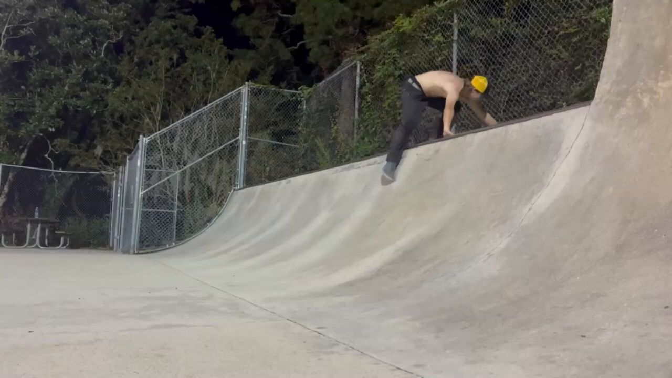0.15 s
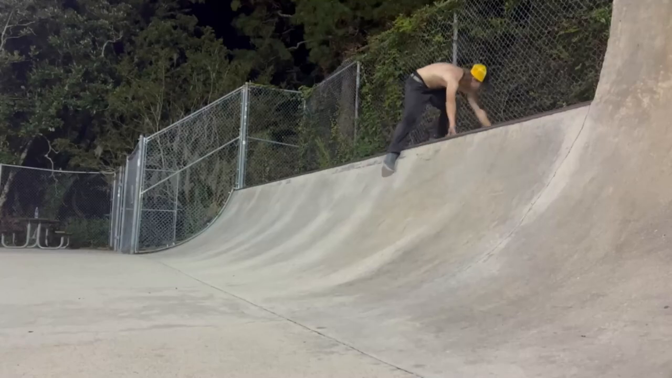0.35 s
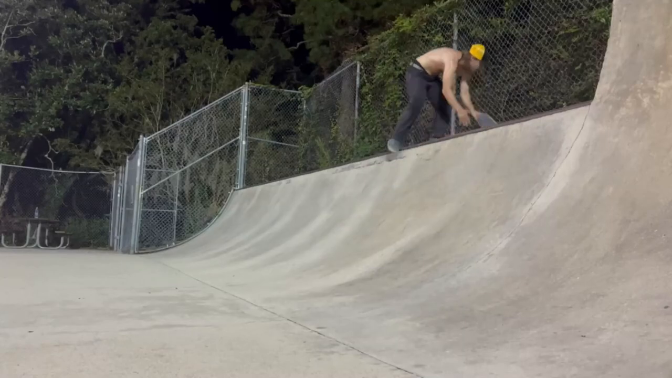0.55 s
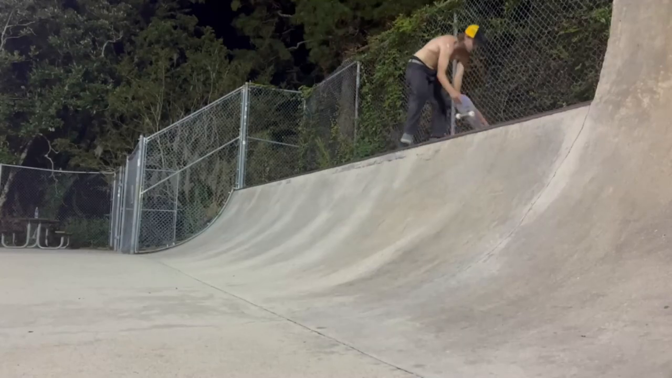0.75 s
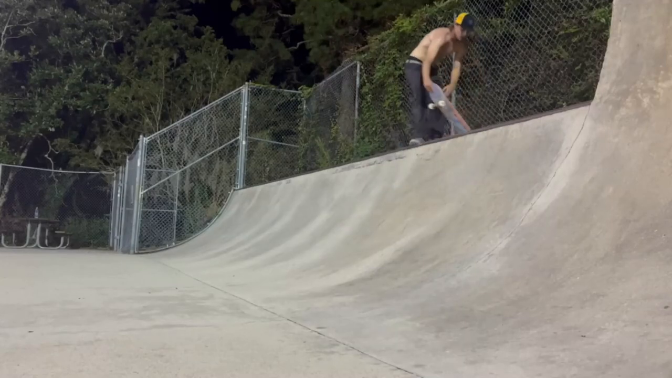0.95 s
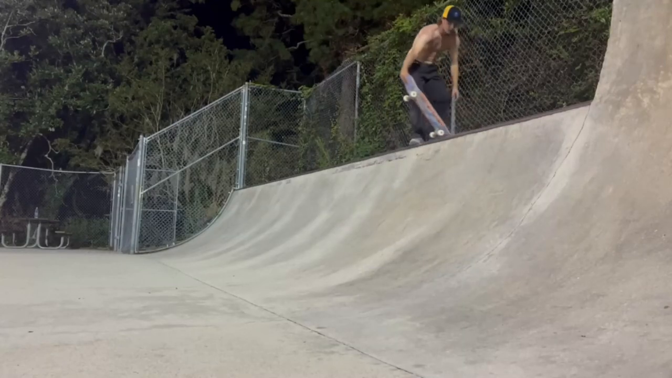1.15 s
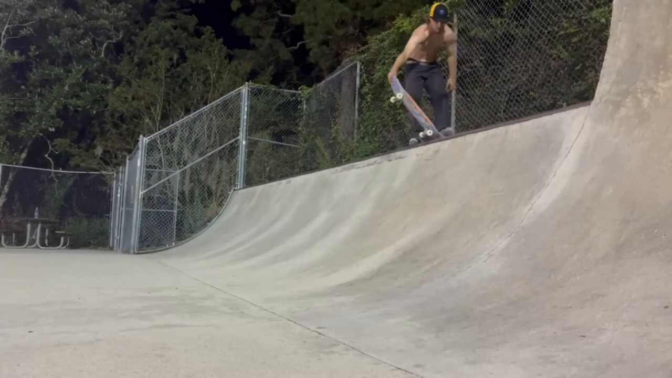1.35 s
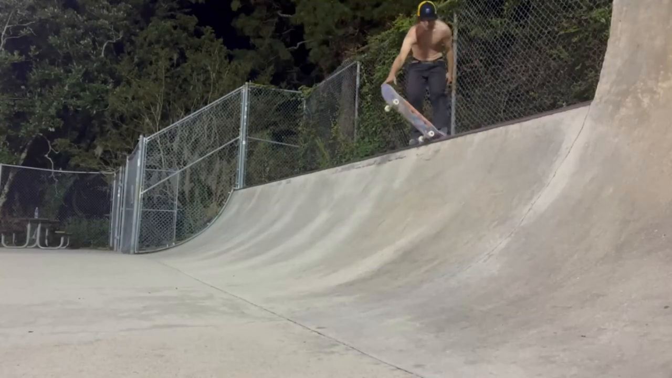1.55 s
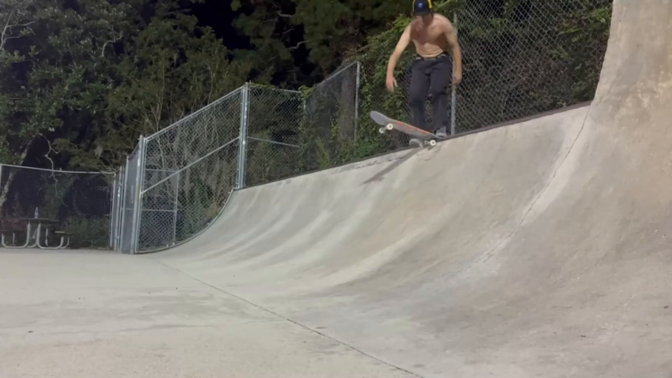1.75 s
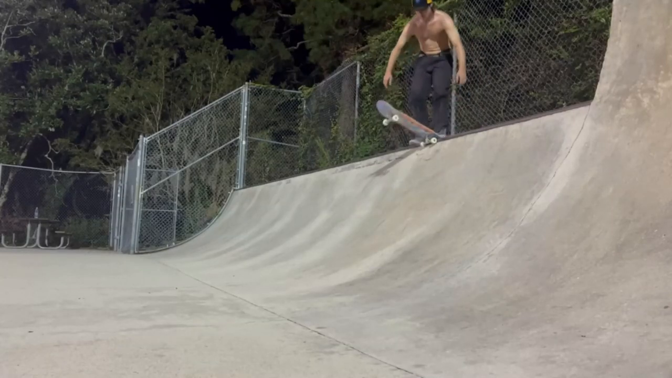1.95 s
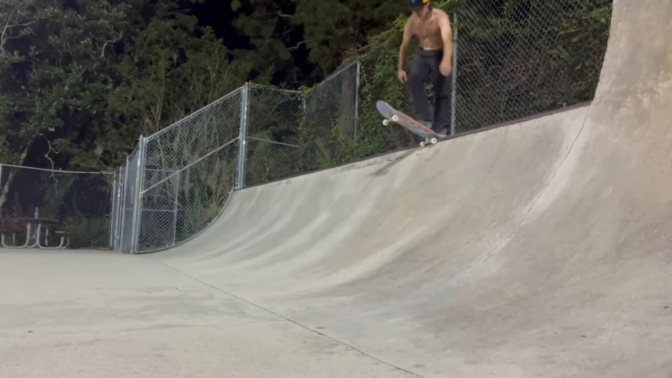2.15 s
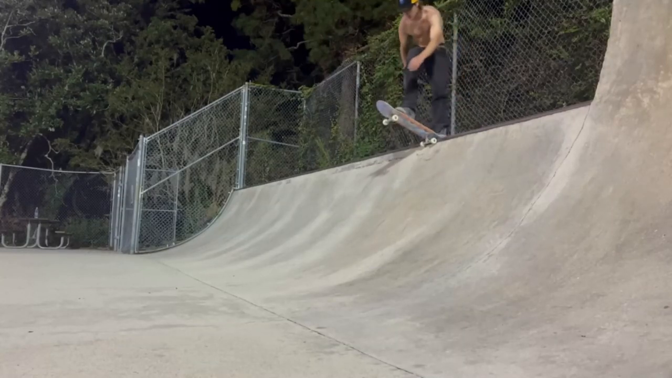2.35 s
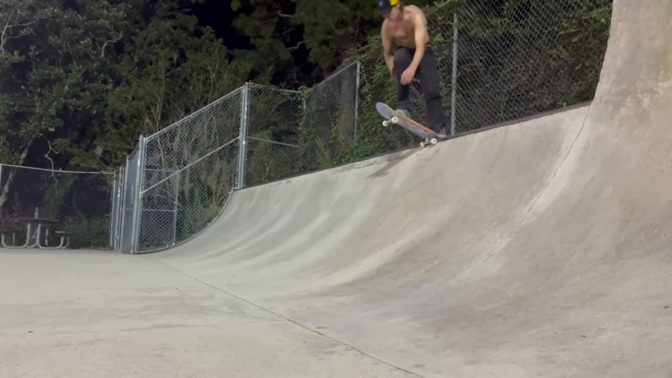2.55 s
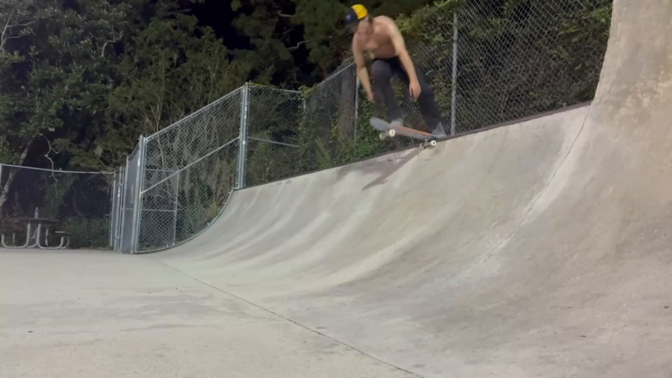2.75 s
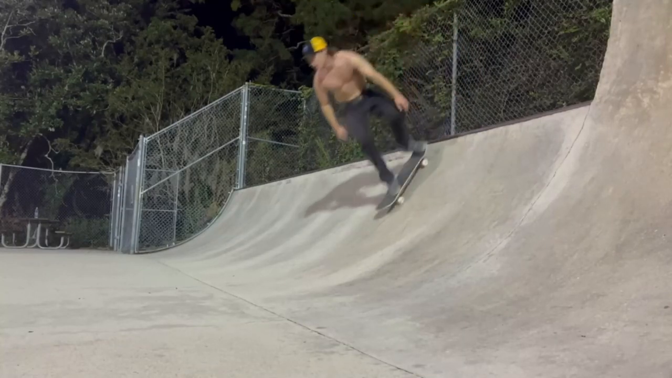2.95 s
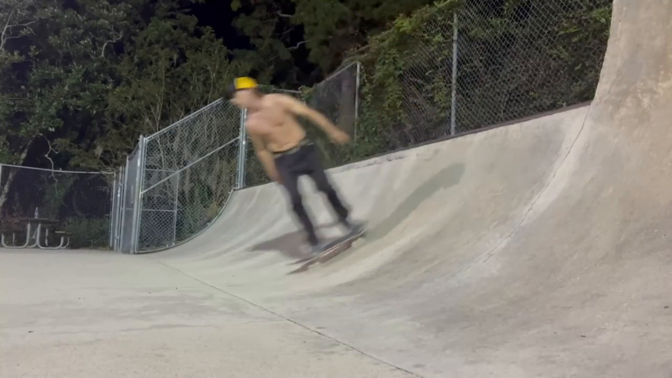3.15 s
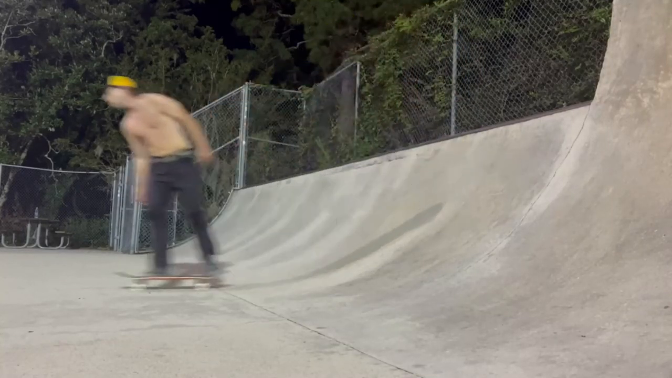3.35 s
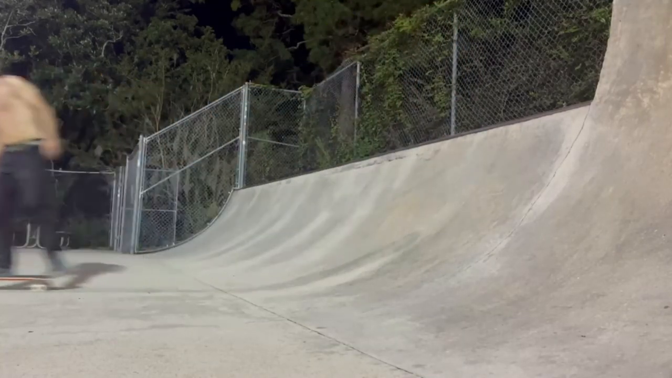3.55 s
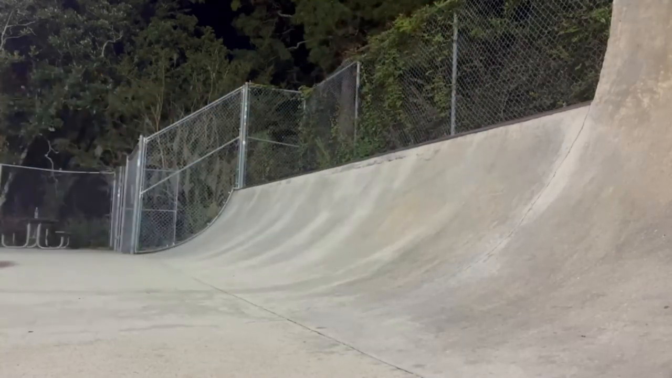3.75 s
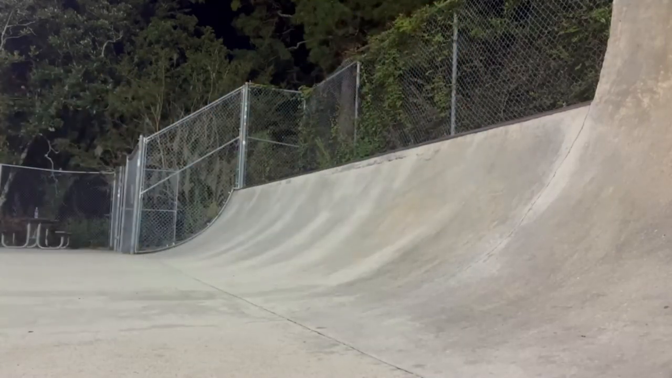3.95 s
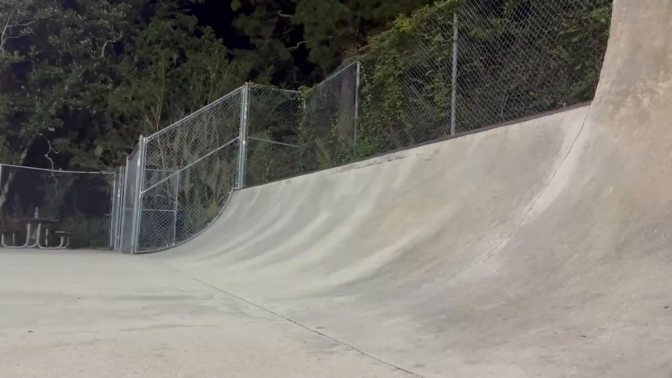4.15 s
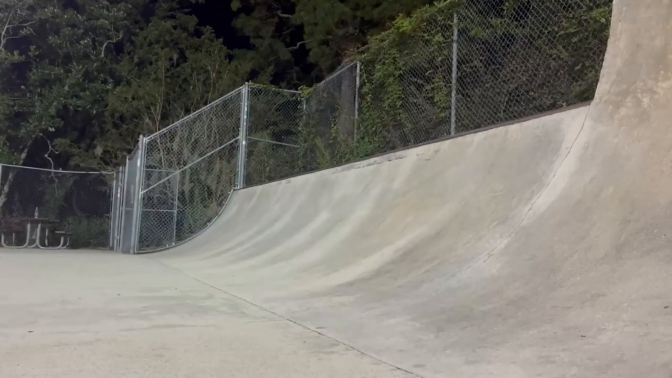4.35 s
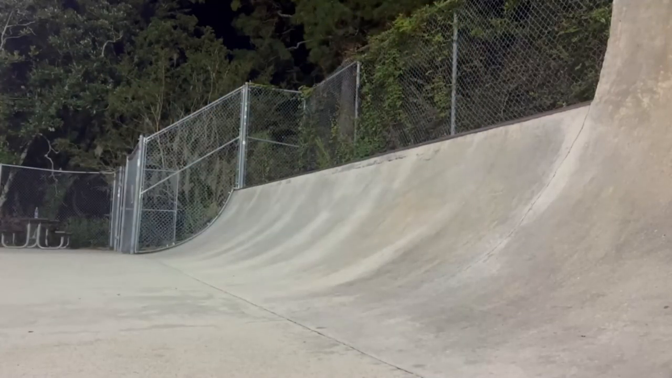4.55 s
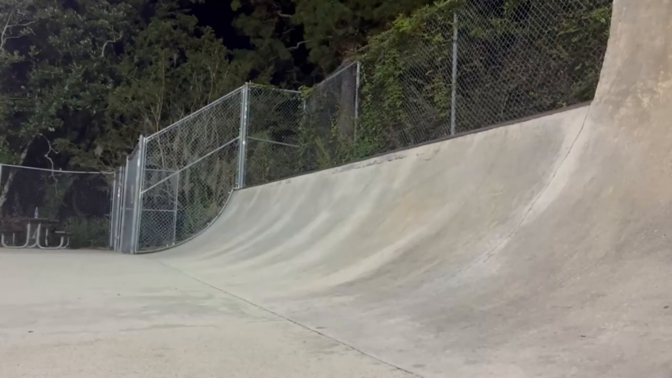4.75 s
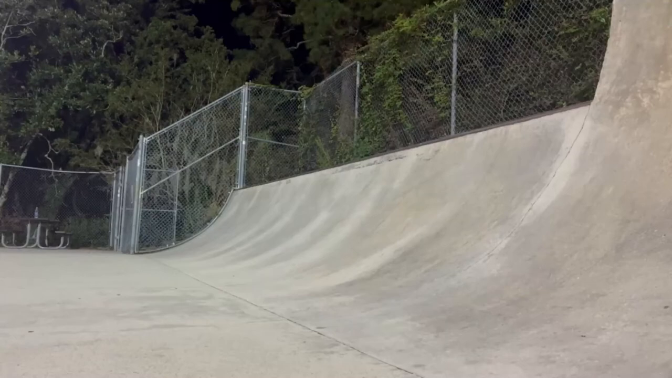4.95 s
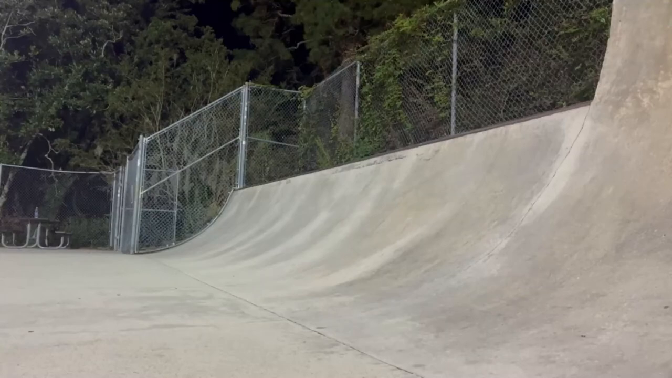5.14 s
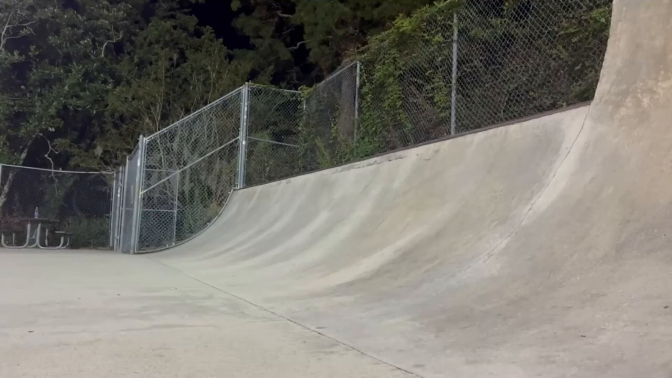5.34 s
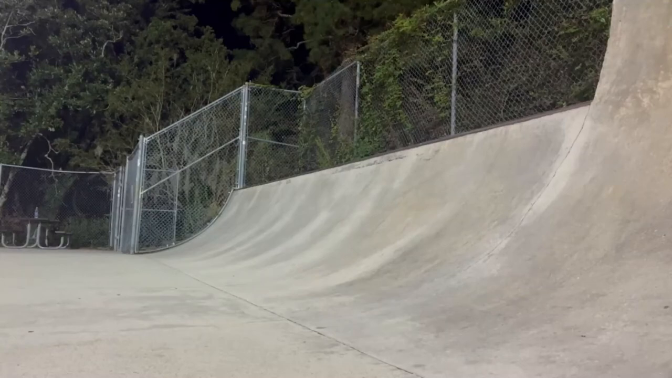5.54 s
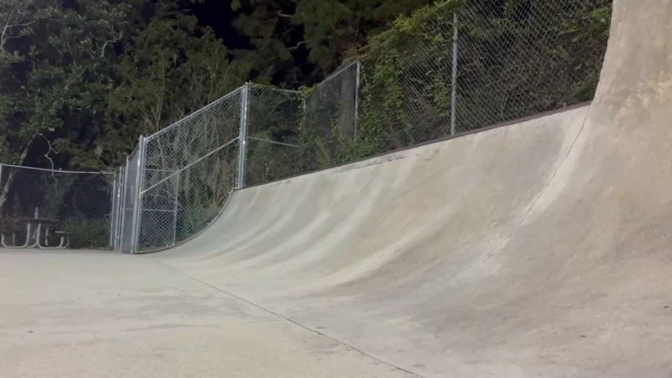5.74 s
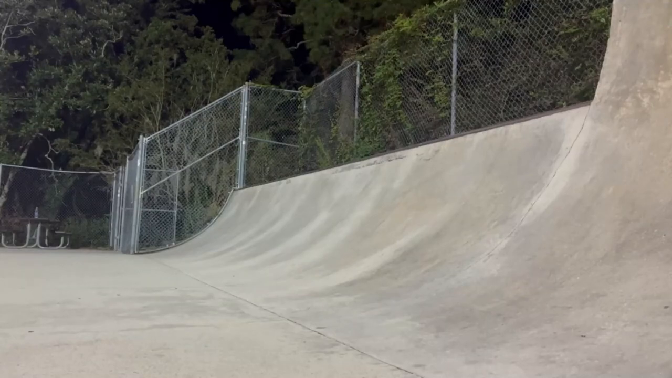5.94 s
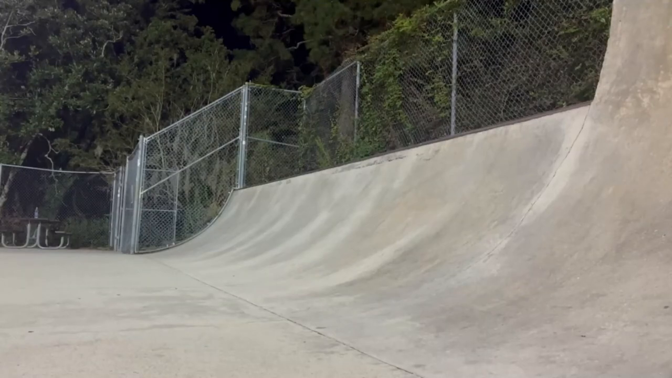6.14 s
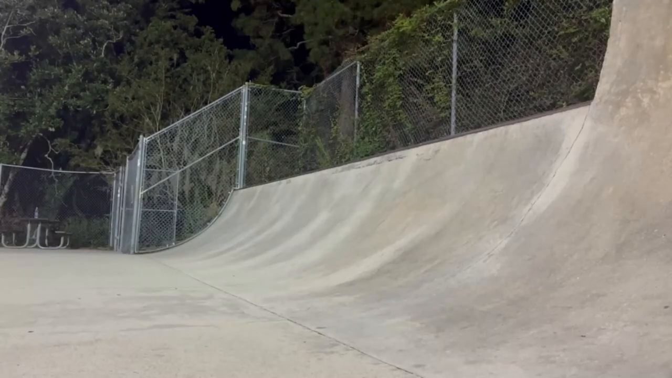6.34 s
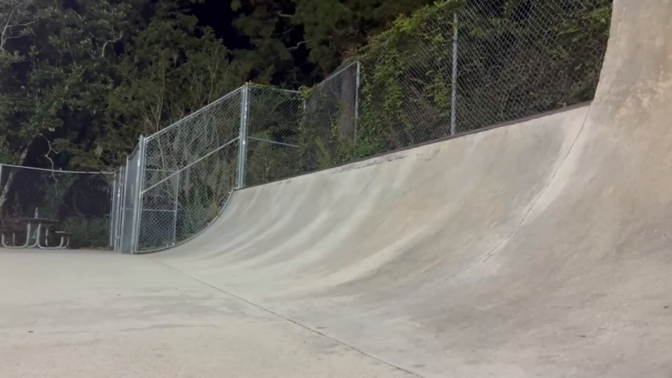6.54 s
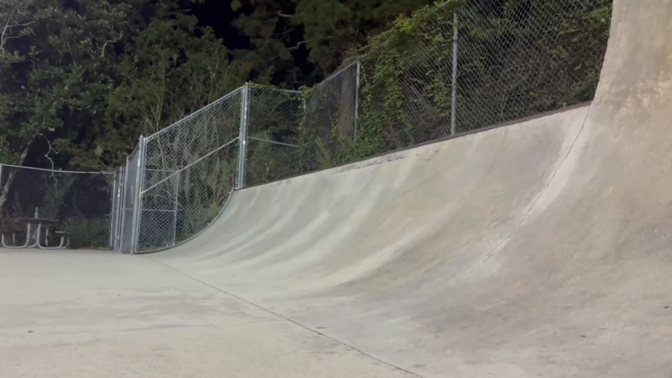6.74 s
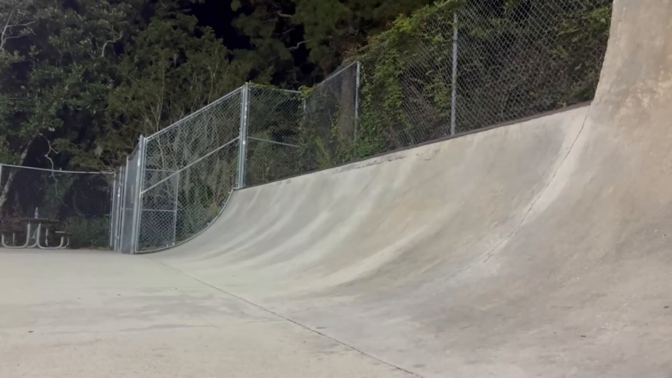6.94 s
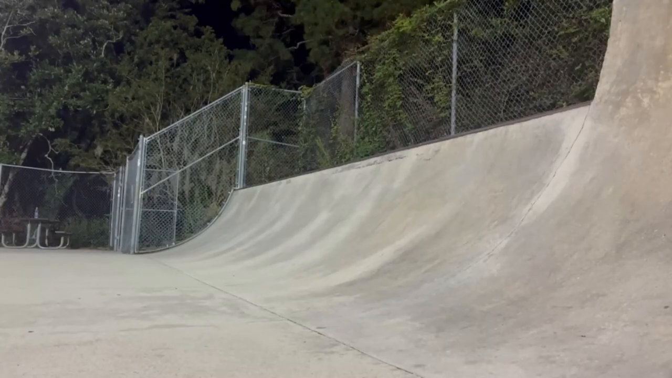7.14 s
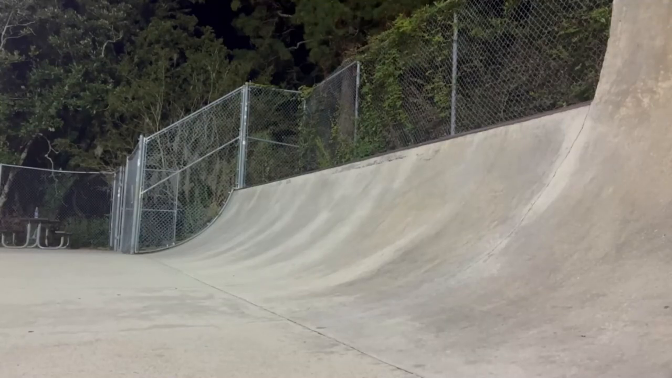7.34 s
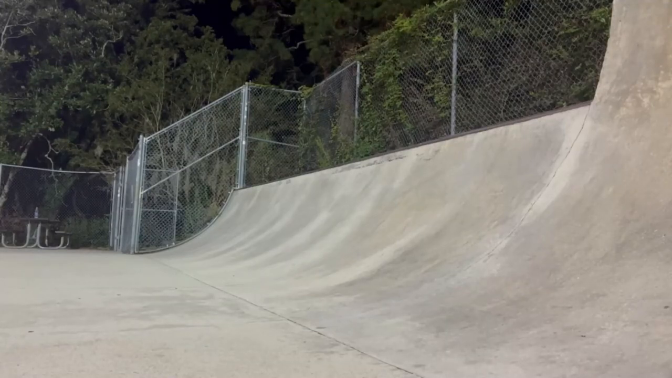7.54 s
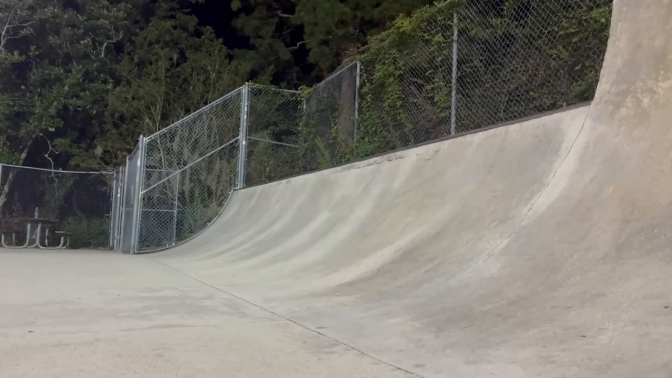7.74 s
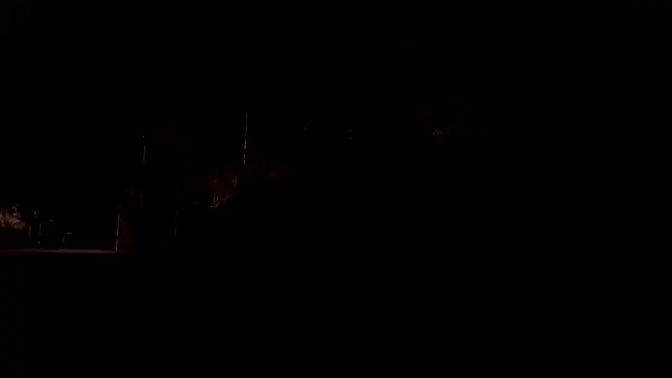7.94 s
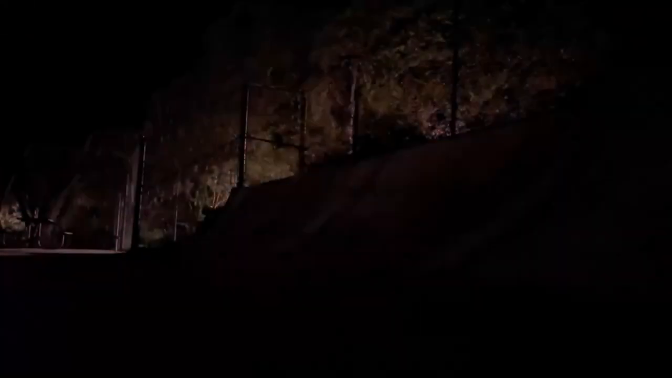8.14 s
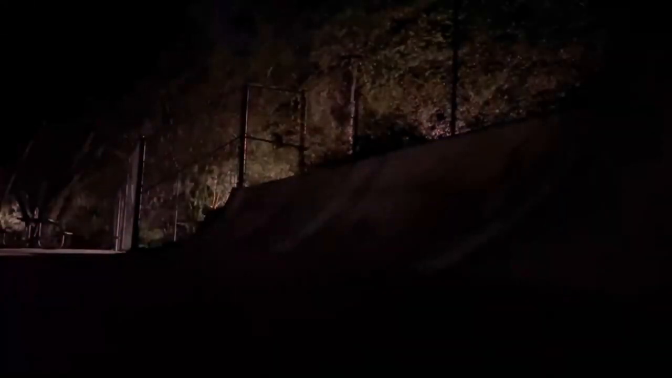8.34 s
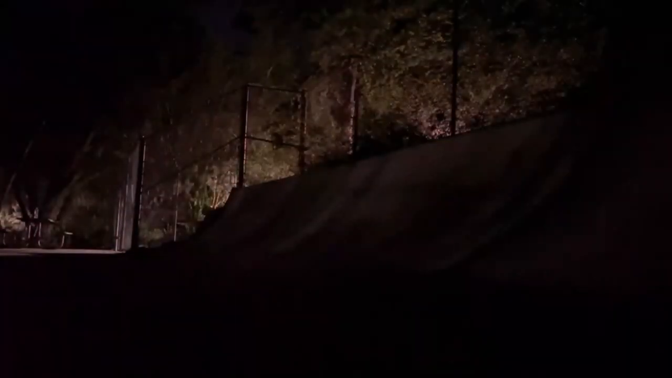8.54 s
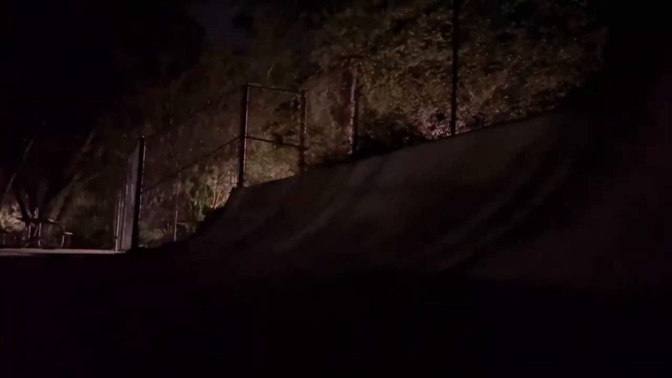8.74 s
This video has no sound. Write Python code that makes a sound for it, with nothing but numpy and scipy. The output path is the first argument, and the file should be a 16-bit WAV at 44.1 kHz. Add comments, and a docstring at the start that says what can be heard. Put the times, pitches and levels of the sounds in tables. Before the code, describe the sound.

Outdoors at night, crickets chirp over a faint low town rumble. A skateboard is dragged and knocked on a concrete ramp edge, giving a short woody groan, then set down with clacks. It slams into the ramp, and hard wheels roar away to the left, fading before a distant pop and clatter. Stereo microphones stay fixed, with little reverberation.

```python
"""Skateboard on a concrete quarter pipe at night: dragged, set on the coping, dropped in, rolled off to
the left, popped and set down. Blows ring deck modes; scrapes and wheels are rough forces shaped by the body.
Crickets chirp and trill as pulsed tones, a far chorus shimmers as banded noise, a town rumbles as low noise.
Two spaced microphones: delay, level, phase, ramp reflections and reverberation follow the board."""
import sys
import numpy as np
from scipy import signal
from scipy.fft import rfft, irfft, next_fast_len
from scipy.io import wavfile
from scipy.ndimage import uniform_filter1d, map_coordinates

SR = 44100
rng = np.random.default_rng(int(sys.argv[2]) if len(sys.argv) > 2 else 0)


def waveform_to_disk(signal):
    """Save audio, clipped to [-1, 1], as 16-bit WAV at the path in sys.argv[1]."""
    frames = np.transpose(np.atleast_2d(signal))
    scaled = np.clip(frames, -1, 1) * 32767
    samples = np.round(scaled).astype(np.int16)
    wavfile.write(sys.argv[1], SR, samples)


N = 392049


def amp(db):
    """Decibels to gain."""
    return 10 ** (np.asarray(db) / 20)


def unit(x):
    """x at rms 1."""
    return x / np.sqrt(np.mean(x ** 2) + 1e-20)


def along(points, hz):
    """(f/Hz, value) points interpolated on a log frequency axis."""
    f, v = np.transpose(points)
    return np.interp(np.log(hz + 1), np.log(f + 1), v)


def curves(rows):
    """One value per sample for each column after t/s."""
    s, *cols = np.transpose(rows)
    return [np.interp(np.arange(N) / SR, s, c) for c in cols]


def wobble(rate_hz):
    """Smooth random curve, rate_hz knots a second."""
    knots = rng.standard_normal(int(N * rate_hz / SR) + 4)
    return map_coordinates(knots, [np.arange(N) * rate_hz / SR])


def filtered(x, response):
    """x times a response of frequency."""
    m = next_fast_len(x.shape[-1] + 8192, True)
    spectrum = rfft(x, m) * response(np.fft.rfftfreq(m, 1 / SR))
    return irfft(spectrum, m)[..., :x.shape[-1]]


def add(track, s, sound):
    """Add a sound to a track at time s."""
    part = track[max(round(s * SR), 0):][:len(sound)]
    part += sound[:len(part)]


def causal(gain):
    """Minimum-phase response of this gain: rings only after the blow."""
    c = irfft(np.log(np.maximum(gain, 1e-6)))
    half = len(c) // 2
    return np.exp(rfft(np.r_[c[0], 2 * c[1:half], c[half], np.zeros(half - 1)]))


def deck(modes, hz):
    """Gain of a flat response lifted by resonances."""
    lifts = (amp(db) ** 2 / (1 + (2 * (hz - f) / width) ** 2) for f, width, db in modes)
    return np.sqrt(1 + sum(lifts))


def thirds(hz, low_hz, high_hz):
    """Gains of a low, a middle and a high band whose powers add to one."""
    low = 1 / (1 + (hz / low_hz) ** 8)
    high = 1 / (1 + (hz / high_hz) ** 8)
    return np.sqrt([low, np.abs(high - low), 1 - high])


def grains(rate_hz, spread_db):
    """Random impulses, rate_hz a second on average, log-normal sizes: sand and pits."""
    hits = rng.random(N) < rate_hz / SR
    return unit(hits * rng.standard_normal(N) * amp(spread_db * rng.standard_normal(N)))


def pair(spectrum, alike):
    """Stereo noise of rms 1; alike sets left-right correlation over frequency."""
    def mid_side(hz):
        turn = np.arccos(np.clip(along(alike, hz), -1, 1)) / 2
        return amp(along(spectrum, hz)) * [np.cos(turn), np.sin(turn)]
    mid, side = filtered(rng.standard_normal((2, N)), mid_side)
    return unit(np.array([mid + side, mid - side]))


def panned(x, ports):
    """Left and right at equal total power, with level and phase differences over frequency."""
    rows = np.array(ports)

    def gains(hz):
        ratio = amp(along(rows[:, :2], hz))
        turn = np.exp(.5j * along(rows[:, ::2], hz))
        return np.array([ratio * turn, turn.conj()]) * np.sqrt(2 / (1 + ratio ** 2))
    return filtered(x, gains)


def shifting(x, depth_db, order=3, size=7):
    """Narrow bands of x come and go in short random patches."""
    z = signal.stft(x, nperseg=1024)[2]
    field = uniform_filter1d(rng.standard_normal(z.shape), order, 0)
    field = uniform_filter1d(field, size, 1)
    return signal.istft(z * amp(depth_db * unit(field)), nperseg=1024)[1][:N]


# exponents of low, middle and high band gain against pressure
PRESSURE_EXPONENTS = [1, 0.79, 1]


def strokes(rows):
    """Low, middle and high band gains: pressure rises, then falls, in each stroke."""
    t, power = np.arange(N) / SR, np.zeros((3, N))
    for s, rise, fall, *band_db in rows:
        pressure = np.minimum(1 + (t - s) / rise, 1 - (t - s) / fall)
        touching = pressure > 0
        gain = amp(band_db)[:, None] * pressure[touching] ** np.c_[PRESSURE_EXPONENTS]
        power[:, touching] += gain ** 2
    return np.sqrt(power)


def rubbing(force, colour, gains, low_hz, high_hz):
    """Rough contact force through a body; low, middle and high parts each at their own gain."""
    parts = filtered(force, lambda hz: colour(hz) * thirds(hz, low_hz, high_hz))
    return sum(gain * unit(part) for gain, part in zip(gains, parts))


# town spectrum: [f/Hz, level/dB]
RUMBLE = [(22, -19.5), (35, -14.5), (48, -1.5), (72, 0), (100, -3), (125, -2.5), (180, -11), (250, -13.5),
          (400, -21), (700, -25), (1100, -34.5), (2200, -38), (4000, -52), (12000, -54)]


def town():
    """Far traffic and machinery: low noise, nearly alike at both microphones in the deep bass."""
    level_db, = curves([(0, -45.5), (3, -46.5), (7.5, -48.5), (8.9, -48.5)])
    noise = pair(RUMBLE, [(80, 1.0), (200, 0.76), (500, 0.16), (2000, 0.0464)])
    return amp(level_db + 0.51 * wobble(5.4)) * noise


# far cricket spectrum: [f/Hz, level/dB]
CHORUS = [(4000, -58), (4700, -24.5), (5100, -8), (5550, 0.5), (5900, -5.5), (6250, 2), (6500, 1),
          (6750, -6.5), (7100, -4), (7400, -22), (7800, -48.5), (9000, -69)]
# left against right, source off to the left: [f/Hz, left excess/dB, phase lead/rad]
ASIDE = [(100, -1, -0.024), (359.5, 3, 0.56), (620, 6, 0.69), (1127, 1.5, 0.07), (2500, 1, -0.47),
         (4000, 1.5, 0.23), (5300, 17, -0.14), (6300, 5, -0.058), (7290, 4.5, 0), (8000, 1, -0.016),
         (10500, 1.5, -0.74)]


def chorus():
    """Countless far crickets merge into a shimmering noise band."""
    crowd = pair(CHORUS, [(5000, 0.209), (7000, .05)])
    crowd = crowd * amp(0.52 * wobble(3.0) + 0.3 * wobble(110))
    # singers join and drop out
    crowd = np.array([shifting(channel, depth_db=4.0, order=4, size=12) for channel in crowd])
    return amp(-54.5) * unit(panned(crowd, ASIDE))


def trill(pitch_hz=2700, width_hz=190, pulse_hz=58.2):
    """Low-pitched cricket trilling without pause: sagging tone pulses, smeared by undergrowth."""
    t = np.arange(N) / SR
    stroke = (pulse_hz * t + 0.11 * wobble(3.1)) % 1
    swept_hz = pitch_hz * (1 - 0.092 * (stroke - .5))
    tone = np.sin(2 * np.pi * np.cumsum(swept_hz) / SR + 0.44 * wobble(60))
    pulse = np.sin(np.pi * stroke) ** 4
    pulses = unit(pulse * tone * amp(1.5 * wobble(12)))
    noise = rng.standard_normal((2, N))
    smear = unit(filtered(noise, lambda hz: 1 / (1 + ((hz - pitch_hz) / width_hz * 2) ** 2) ** 1.58))
    throb = unit(.55 + pulse)  # nearby leaves scatter in step with the strokes
    return amp(-77.5) * pulses + amp(-62.0) * smear * throb


# drag colour: [f/Hz, level/dB]
RUB = [(80, -35.5), (180, -9), (265, 4), (380, 0), (640, 2.5), (830, -2), (1200, -7.5), (2000, -11.5),
       (2550, -5.5), (3600, -2), (4600, 1), (6500, 1.5), (9000, 2.5), (12000, -9)]
# board and shoe strokes: [peak t/s, rise/s, fall/s, deck drone level/dB, rasp level/dB, grit level/dB]
SCRAPES = [(.48, 0.42, 0.38, -57.5, -53, -51), (1.08, 0.43, 0.2, -30, -32.5, -47),
           (1.275, 0.04, 0.076, -40.5, -50.5, -61), (1.56, 0.17, 0.12, -51.5, -56.5, -64.5),
           (1.72, 0.052, 0.01, -34.5, -57, -41.5), (1.86, 0.25, 0.35, -43.5, -53, -56.5),
           (2.41, 0.081, 0.097, -48, -53.5, -59), (2.69, 0.11, 0.14, -49, -56.5, -68),
           (2.835, 0.076, 0.042, -62, -51, -55)]
# modes in the hand: [f/Hz, width/Hz, lift/dB]
HELD = [(295, 47, 21), (470, 57, 25), (560, 60, 14), (720, 82, 8.5), (1045, 130, 11.5), (1215, 150, 10.5),
        (1486, 120, 9.5), (1790, 70, 11.5), (1980, 74, 8.5), (2600, 83, -8), (3170, 140, 1.5)]
# modes on the coping: [f/Hz, width/Hz, lift/dB]
PERCHED = [(210, 49, 19), (303, 50, 3.8), (438, 50, 13.8), (566, 91, 17), (930, 45, 6.5), (1217, 97, 8.4),
           (1550, 120, 11), (1864, 98, 11), (2242, 103, 12.2), (2750, 230, 3.3), (3390, 140, 8),
           (9800, 4700, 10.7)]
SKIPS_PER_S, SKIP_DB = 31, 1.4  # mean rate; swing either way


def scrape():
    """Board chatters over concrete, catching and slipping: in the hand, then on the coping."""
    t = np.arange(N) / SR
    skips = np.cos(2 * np.pi * (SKIPS_PER_S * t + 0.33 * wobble(14)))
    force = grains(rate_hz=5000, spread_db=1.0) + 0.71 * rng.standard_normal(N)
    force = force * amp(SKIP_DB * skips + 1.0 * wobble(110))
    force = shifting(force, depth_db=3.2, order=7, size=4)
    gains = strokes(SCRAPES)

    def through(modes):
        return rubbing(force, lambda hz: amp(along(RUB, hz)) * deck(modes, hz), gains, 1150, 2200)
    perched_from_s = STANCES[1][0]
    return np.where(t < perched_from_s, through(HELD), through(PERCHED))


# scattered tail: [f/Hz, t60/s]
PARK = [(150, 0.22), (1000, 0.11), (3000, 0.095), (10000, 0.08)]


def park(x):
    """Ramps, fence and trees scatter a thin decaying tail, different at each microphone."""
    hz, t, z = signal.stft(rng.standard_normal((2, SR // 2)), SR, nperseg=256)
    decay = amp(-60 * t / along(PARK, hz)[:, None])
    tail = signal.istft(z * decay, SR, nperseg=256)[1]
    tail = tail * (1 - np.exp(-np.arange(tail.shape[1]) / SR / 0.00076))
    return signal.fftconvolve(x[None], tail / np.linalg.norm(tail[0]), axes=1)[:, :N]


# near crickets: [mean f/Hz, level before panning/dB, list of chirp t/s]
CRICKETS = [(5165, -61, [1.42, 2.82, 4.44, 6.2, 7.88]),
            (5355, -59.5, [.58, 1.8, 2.54, 3.07, 4.48, 5.81, 7.08, 8.47]),
            (5410, -56.5, [.69, 2.11, 3.71, 5.02, 6.58, 8.68]), (5510, -53.5, [.43, 1.58]),
            (5545, -61, [1.44, 2.14, 2.62, 3.13, 3.7, 4.48, 5.53, 5.92, 6.65, 7.48, 7.96, 8.6]),
            (5780, -63.5, [.08, .48, 2.19, 3.36, 4.73, 6.18, 6.43, 7.64, 8.36])]
CHIRP_SCATTER = .002  # relative pitch deviation from chirp to chirp


def chirps(length_s=0.13, pulse_hz=63, sag=0.043):
    """Chirp: a run of wing strokes, each a tone sagging in pitch; bushes on the left blur it."""
    out, t = np.zeros(N), np.arange(int(length_s * SR)) / SR
    swell = np.sin(np.pi * t / length_s) ** .5
    flutter = np.pad(wobble(120), (0, SR))
    for hz, db, times in CRICKETS:
        for s, (pace, sharp) in zip(times, rng.standard_normal((len(times), 2))):
            stroke = (t * pulse_hz * (1 + 0.0173 * pace)) % 1
            swept_hz = hz * (1 + CHIRP_SCATTER * sharp - sag * (stroke - .5))
            phase = 2 * np.pi * np.cumsum(swept_hz) / SR
            tone = np.sin(phase + .5 * flutter[round(s * SR):][:len(t)])
            add(out, s, amp(db) * unit(swell * np.sin(np.pi * stroke) ** 2 * tone))
    return (amp(2.5) * out + amp(0.5) * park(out)) * amp([[0], [-13]])


# blows on the board, with a few faint echoes after the pop:
# [t/s, contact length/s, level/dB, clack over thud/dB, tick over level/dB]
KNOCKS = [(0.403, 0.015, -54.5, 10, -14), (0.426, .016, -58, 9, -16), (0.449, 0.016, -67, 2, -1),
          (0.489, 0.014, -52, 6, -23), (0.579, 0.01, -40.5, -5.5, -31), (0.645, 0.03, -46, -0.5, -14),
          (0.682, 0.01, -33, -0.5, -8.5), (0.688, 0.0088, -32, 4.5, -9.5), (0.721, 0.01, -36, -6, -7),
          (0.727, 0.015, -39.5, -2, -7), (0.756, 0.016, -36.5, 0, -7), (0.792, 0.0097, -36, -1, -13),
          (0.83, 0.016, -49, -4, -10), (.895, 0.022, -40.5, 15, -9), (1.096, 0.024, -35, 2, -3),
          (1.129, 0.016, -40, -6, -9), (1.202, 0.016, -37, -8, -7.5), (1.6717, 0.0087, -29.5, 7, -7),
          (1.686, 0.0036, -42, 0, -16), (1.705, 0.0046, -33.5, -1, -8.5), (1.786, 0.015, -35.5, -9.5, -10),
          (1.815, 0.012, -40.5, 8, 3), (1.972, 0.0045, -37, -5.5, -25), (2.026, .012, -51, -6, -13),
          (2.374, 0.0051, -34.5, -2, -10), (2.42, 0.0081, -37.5, -10.5, -31),
          (2.661, 0.0055, -43.5, 3, -21), (2.671, 0.0064, -40.5, -5, -8), (2.728, 0.005, -54, -2, -7),
          (2.9595, 0.0061, -27, -2, -1), (2.962, 0.0085, -17, -2.5, -9.5), (2.973, 0.022, -32, -18, -21.5),
          (3.274, 0.023, -39.5, -10.5, -33), (3.348, 0.022, -43, -19, -10.5), (3.399, 0.0059, -44.5, 0, 2),
          (7.172, 0.017, -45.5, 3.5, -4), (7.2977, 0.0098, -37, 9, 3), (7.302, 0.0097, -29.5, -8, -16),
          (7.327, .008, -58, 2, -2), (7.352, 0.0088, -49.5, 7, 0), (7.36, 0.0066, -55, 3, -8),
          (7.4, 0.0125, -40, 7, -11), (7.407, 0.009, -32, 0, -11.5), (7.457, .014, -59, -1, -12),
          (7.476, .012, -51, -8, -25.5), (7.52, 0.025, -52.5, -3, -7), (7.951, .012, -35.5, -16.5, -13),
          (7.988, 0.021, -51, -23, -28)]
# blow colour: [f/Hz, level/dB]
BLOW = [(40, -11.5), (90, 0), (200, -3), (350, -2.5), (650, 3.5), (1100, 12.5), (2000, 8), (3300, 1.5),
        (4600, -3), (7000, -6.5), (9000, -14.5), (12000, -13)]
# modes ridden: [f/Hz, width/Hz, lift/dB]
RIDDEN = [(85, 47, 16), (200, 60, 3.9), (339, 44, 15.6), (401, 85, 18.2), (725, 49, 9.8), (870, 69, 15),
          (1307, 110, 8.1), (1580, 120, 5.5), (2050, 150, 5.9), (2590, 130, 12.2), (3020, 140, 10.6),
          (3390, 170, 14.4), (9600, 2200, 18)]
# modes popped loose: [f/Hz, width/Hz, lift/dB]
LOOSE = [(273.6, 71, 19), (464, 61, 21.6), (661, 120, 17.7), (965, 36, 6.8), (1195, 60, 10),
         (1380, 45, 6.8), (1614, 75, 11.5), (2102, 71, 15), (2376, 34, 15), (2735, 51, 17),
         (4120, 100, 13.6), (4860, 150, 19)]
# narrow woody modes, empty board back on its wheels: [f/Hz, width/Hz, lift/dB]
SET_DOWN = [(269, 63, 23.5), (439, 46, 26), (724, 30, 15), (940, 20, 25), (1355, 25, 21.5), (1540, 90, 15),
            (1900, 78, 10), (2290, 52, 20.5), (2650, 49, 11)]
# support of the board: [start t/s, mode table]
STANCES = [(0, HELD), (1.5, PERCHED), (2.9, RIDDEN), (5, LOOSE), (7.38, SET_DOWN), (7.8, LOOSE)]
THUD_TOP_HZ, CLACK_TOP_HZ = 618, 2355  # band edges at the usual blow; tick above
CLACK_OCTAVE_DB, USUAL_BLOW_DB = 40, -28.5  # clack edge rises an octave per 40 dB of blow


def knocks(size=4096):
    """Short crunches of contacts ring the deck in the modes of its stance; faint echoes share the method."""
    out, hz, t = np.zeros(N), np.fft.rfftfreq(size, 1 / SR), np.arange(size) / SR
    colour = amp(along(BLOW, hz))
    buzz = amp(-7 - 60 * t / .026)  # loose hardware rattles after the blow
    for s, length, db, hard_db, tick_db in KNOCKS:
        band_db = [db - hard_db / 2, db + hard_db / 2, db + tick_db]
        press = np.abs(np.sin(np.pi * np.minimum(t / length, 1))) ** 0.53 + buzz
        crunch = rng.standard_normal(size)
        for _ in range(8):  # flatten the spectrum: a hard contact holds all frequencies alike
            crunch = irfft(np.exp(1j * np.angle(rfft(crunch * press))))
        force = rfft(crunch * press)
        modes = [table for start, table in STANCES if start <= s][-1]
        # each spot favours other modes
        struck = [(f, width, lift + 1.5 * rng.standard_normal()) for f, width, lift in modes]
        clack_top_hz = CLACK_TOP_HZ * 2 ** ((db - USUAL_BLOW_DB) / CLACK_OCTAVE_DB)
        body = thirds(hz, THUD_TOP_HZ, clack_top_hz) * colour * deck(struck, hz)
        energy = np.sum(irfft(body * force) ** 2, axis=1) / (.02 * SR)  # levels: rms over 20 ms
        gain = np.sqrt((amp(band_db) ** 2 / energy) @ body ** 2)
        add(out, s, irfft(force * causal(gain)))
    return out


DRONE_S, DRONE_RISE_S, DRONE_FALL_S, DRONE_DB = 1.055, 0.0505, 0.04, -24
DRONE_LIGHT_HZ, DRONE_PRESSED_HZ = 462, 432


def drone():
    """Slips lock onto the deck's bending mode: a rough groan whose pitch sinks under pressure."""
    t = np.arange(N) / SR - DRONE_S
    pressure = np.exp(-np.maximum(-t / DRONE_RISE_S, t / DRONE_FALL_S))
    pitch_hz = DRONE_LIGHT_HZ + (DRONE_PRESSED_HZ - DRONE_LIGHT_HZ) * np.sqrt(pressure)
    tone = np.sin(2 * np.pi * np.cumsum(pitch_hz) / SR + 0.95 * wobble(70.27))
    return amp(DRONE_DB) * pressure * unit(tone * amp(1.3 * wobble(80)))


GROAN_S, GROAN_FADE_S, GROAN_HZ, GROAN_DB = 1.113, 0.078, 287, -33


def groan():
    """Under the heaviest drag the deck also shudders in its lowest mode: narrow-band noise."""
    swell = np.exp(-np.abs(np.arange(N) / SR - GROAN_S) / GROAN_FADE_S)
    shudder = filtered(rng.standard_normal(N), lambda hz: 1 / (1 + ((hz - GROAN_HZ) / 45) ** 4))
    return amp(GROAN_DB) * swell * unit(shudder)


# loose trucks and bearings after a jolt: [t/s, length/s, starting level/dB]
RATTLES = [(1.83, 0.28, -61), (7.327, 0.15, -45.5), (7.41, .24, -54.5)]


def rattles(size=4096):
    """Small uneven clicks of loose hardware ring the board's upper modes."""
    hz, t = np.fft.rfftfreq(size, 1 / SR), np.arange(N) / SR
    ring = irfft(causal(deck(LOOSE, hz) ** 2 * thirds(hz, 1100, 2600)[1]))
    clicks = unit(signal.fftconvolve(grains(rate_hz=360, spread_db=1.1), ring)[:N])
    level = sum(amp(db) * (t > s) * np.clip(1 - (t - s) / length, 0, 1) for s, length, db in RATTLES)
    return clicks * level


# coast away from the ramp: [t/s, common level before offsets/dB]
COAST = [(3.08, -32.5), (3.25, -39.5), (3.45, -34.5), (3.7, -30.5), (4.1, -32.5), (4.75, -38.5), (5.2, -38),
         (5.55, -37.5), (5.88, -42), (6.1, -48.5), (6.6, -57), (6.9, -44.5), (7.15, -47)]
COAST_START_S, COAST_END_S, COAST_FADE_S = 2.92, 7.33, 0.3
ROAR_OFFSET_DB, TREBLE_OFFSET_DB = -2.5, -17  # re common level
WHIRR_PEAK_DB, WHIRR_DB_PER_DB = -56, 0.933  # bearings on the flat; slope against common level
RAMP_FOOT_S, RAMP_BLEND_S, RAMP_WHIRR_LIFT_DB = 4, 0.13, 3.5  # wheels brighter on the slope


def coast():
    """Gains of roar, bearing whirr and treble: one level as the board slows and recedes."""
    t, (level_db,) = np.arange(N) / SR, curves(COAST)
    rolling = np.clip(np.minimum(t - COAST_START_S, COAST_END_S - t) / COAST_FADE_S, 0, 1)
    on_ramp = np.clip((RAMP_FOOT_S - t) / RAMP_BLEND_S, 0, 1)
    whirr_db = WHIRR_PEAK_DB + WHIRR_DB_PER_DB * (level_db - level_db.max())
    whirr_db = whirr_db + RAMP_WHIRR_LIFT_DB * on_ramp
    return rolling * amp([level_db + ROAR_OFFSET_DB, whirr_db, level_db + TREBLE_OFFSET_DB])


# hollow note drifting as the board recedes: [t/s, centre f/Hz, lift/dB]
HOLLOW = [(3, 410, 0.5), (3.4, 390, 4), (3.7, 333, -0.5), (4, 335, 2.5), (4.4, 373, 2.5), (4.8, 390, 2),
          (5.1, 295, 2), (5.6, 300, 2.5), (6.2, 336, 1.5), (7.2, 295, 0.5)]
HOLLOW_DIES_HZ = 890


def hollow(x):
    """Moving spectral ripple, first peak above 0 Hz on the hollow note, fading up the spectrum."""
    hz, t, z = signal.stft(x, SR, nperseg=2048)
    s, *cols = np.transpose(HOLLOW)
    centre_hz, lift_db = (np.interp(t, s, c) for c in cols)
    fade = np.exp(-(hz[:, None] / HOLLOW_DIES_HZ) ** 2)
    ripple = np.cos(2 * np.pi * hz[:, None] / centre_hz) * fade
    return signal.istft(z * amp(lift_db * ripple), SR, nperseg=2048)[1][:N]


# wheel colour: [f/Hz, level/dB]
WHEEL = [(50, -40), (90, -3), (220, 0), (340, 4), (450, 3.5), (560, 5.5), (720, 0.5), (980, 1), (1200, -7),
         (1500, -12.5), (2000, -15), (2600, -13), (3500, -24), (6000, -16.5), (7500, -32.5), (8800, -26.5),
         (12000, -81)]
# wheel surges, as after landing, pop, set-down:
# [peak t/s, rise/s, fall/s, roar level/dB, whirr level/dB, treble level/dB]
SPINS = [(2.99, 0.046, 0.068, -30, -67, -47.5), (3.2, 0.14, 0.17, -55, -59, -70),
         (6.3, 0.53, 0.56, -62, -55.5, -62.5), (7.34, 0.037, 0.42, -50, -56, -55),
         (7.99, 0.14, 0.19, -45.5, -63, -72)]


def roll():
    """Four hard wheels over countless fine pits: a dense, lumpy roar."""
    force = grains(rate_hz=9000, spread_db=2.5) + 0.8 * rng.standard_normal(N)
    force = force * amp(0.9 * wobble(50) + 0.6 * wobble(9))
    force = shifting(force, depth_db=2.5, order=4, size=4)  # surface varies from patch to patch
    gains = np.hypot(coast(), strokes(SPINS))
    return rubbing(hollow(force), lambda hz: amp(along(WHEEL, hz)), gains, 1130, 2000)


# treble hiss spectrum: [f/Hz, level/dB]
HISS = [(4500, -39), (6500, -18.5), (8500, 14.5), (9600, -8.5), (10400, -49.5), (11500, 9.5), (12500, -21)]


def hiss():
    """Airy, uneven treble hiss follows the rolling level, almost unrelated at the two microphones."""
    return amp(-13.0 + 0.57 * wobble(10)) * coast()[2] * pair(HISS, [(6000, 0.068)])


# wheel rush in the curve: [f/Hz, width/Hz, lift/dB]
CARVE = [(925, 150, 15), (1640, 160, 17), (2090, 130, 16.5), (2740, 360, 11)]
CARVE_S, CARVE_RISE_S, CARVE_FALL_S, CARVE_DB = 3.3, 0.31, 0.17, -43
BOOM_HZ, BOOM_WIDTH_HZ, BOOM_DB = 185, 114, -41


def carve():
    """Load in the curve: wheels rush in resonant bands and the ramp thrums."""
    t = np.arange(N) / SR - CARVE_S
    load = np.clip(np.minimum(1 + t / CARVE_RISE_S, 1 - t / CARVE_FALL_S), 0, 1)
    rush = filtered(rng.standard_normal(N), lambda hz: deck(CARVE, hz) * thirds(hz, 714, 4380)[1])
    boom = filtered(rng.standard_normal(N), lambda hz: 1 / (1 + (2 * (hz - BOOM_HZ) / BOOM_WIDTH_HZ) ** 2))
    return np.sqrt(load) * (amp(CARVE_DB) * unit(rush) + amp(BOOM_DB) * unit(boom))


def ramp(x, count=14, span_s=.016):
    """Curved concrete returns a cluster of quick reflections, redrawn every 0.2 s and crossfaded."""
    size, hop = int(span_s * SR), SR // 5
    out, padded = np.zeros((2, N + hop)), np.pad(x, (hop, 2 * hop))
    fade = np.sin(np.pi * np.arange(2 * hop) / (2 * hop))
    for start in range(0, N + hop, hop):
        for channel in out:
            late, taps = rng.random(count), np.zeros(size + 40)
            taps[40 + (late * size).astype(int)] = rng.choice([-1, 1], count) * amp(-12 * late)
            block = padded[start:start + 2 * hop] * fade
            add(channel, start / SR, signal.fftconvolve(block, taps / np.linalg.norm(taps)))
    return out[:, hop:]


# board position: [t/s, lead at left/ms, share off to the left/0-1, ramp level/dB, reverberation level/dB]
PATH = [(0, -0.021, 0.33, -11, -7), (2.95, -0.036, 0.6, -7.5, -17), (3.3, 0.11, 0.8, -11, -37),
        (3.55, 0.23, 1, -18, -24), (4, 0.35, 1, -11, -16), (4.8, 0.45, 0.95, -32, -13),
        (8, 0.48, 0.96, -9, -9)]
# left against right, source ahead: [f/Hz, left excess/dB, phase lead/rad]
AHEAD = [(100, -0.5, -7), (380, -0.5, -0.6), (609, -4, -1.8), (890, -7, -1.5), (1687, -7, -1.95),
         (2700, -6.5, 1.5), (3800, -8.5, -0.5), (5400, -1, 0.5), (7500, -8.5, -2), (9200, -12, 0),
         (10500, -4.5, -1.5)]


def skateboard():
    """As the board moves left its sound reaches the left microphone earlier, in another colour."""
    board = knocks() + rattles() + scrape() + drone() + groan() + roll() + carve()
    lead_ms, aside, ramp_db, wet_db = curves(PATH)
    aside = np.clip(aside, 0, 1)
    both = (1 - aside) * panned(board, AHEAD) + aside * panned(board, ASIDE)
    reads = np.arange(N) + np.outer([.5, -.5], lead_ms) * SR / 1000
    direct = np.array([map_coordinates(channel, [read]) for channel, read in zip(both, reads)])
    # the curves scatter the middle of the range
    middle = filtered(board * amp(ramp_db), lambda hz: thirds(hz, 480, 5840)[1])
    return direct + ramp(middle) + park(board * amp(wet_db))


def scene():
    """The skateboard among the night sounds."""
    return skateboard() + hiss() + chirps() + chorus() + trill() + town()


FULL_SCALE, TOP_HZ = 0.85, 12200


def record(dry):
    """Round off peaks towards FULL_SCALE, then cut steeply above TOP_HZ."""
    rounded = dry / (1 + (dry / FULL_SCALE) ** 8) ** (1 / 8)
    return filtered(rounded, lambda hz: 1 / (1 + (hz / TOP_HZ) ** 80))


dry = scene()
out = record(dry)
waveform_to_disk(out)
```